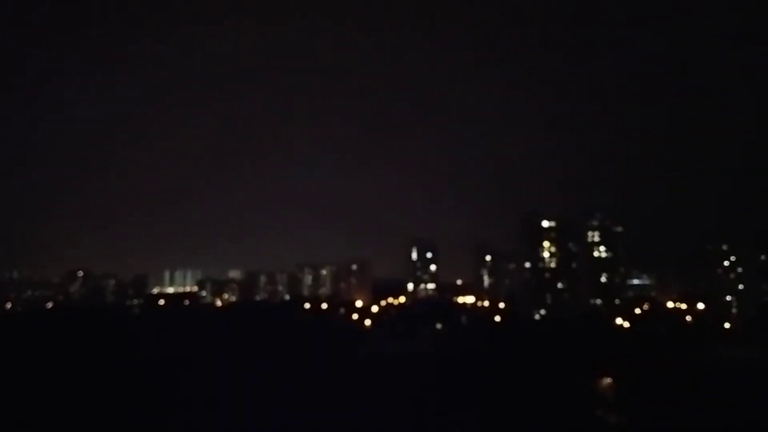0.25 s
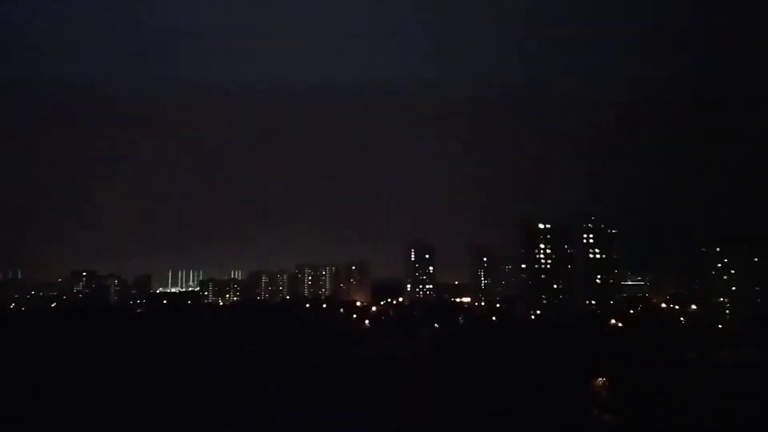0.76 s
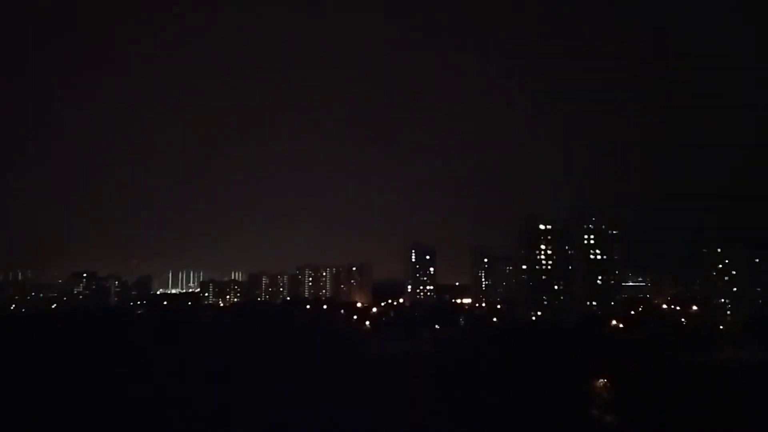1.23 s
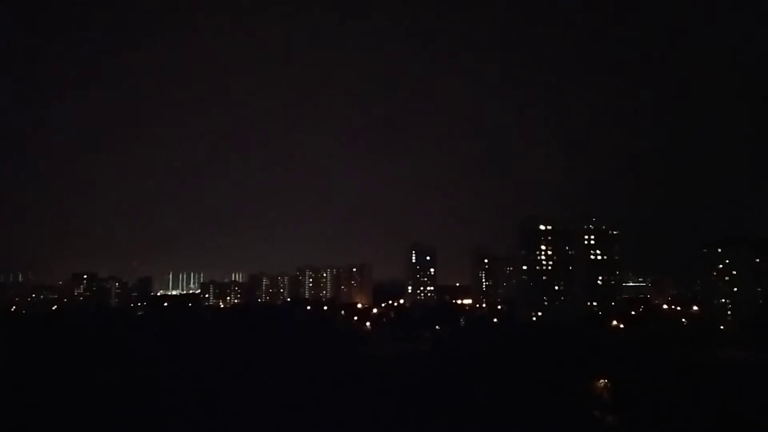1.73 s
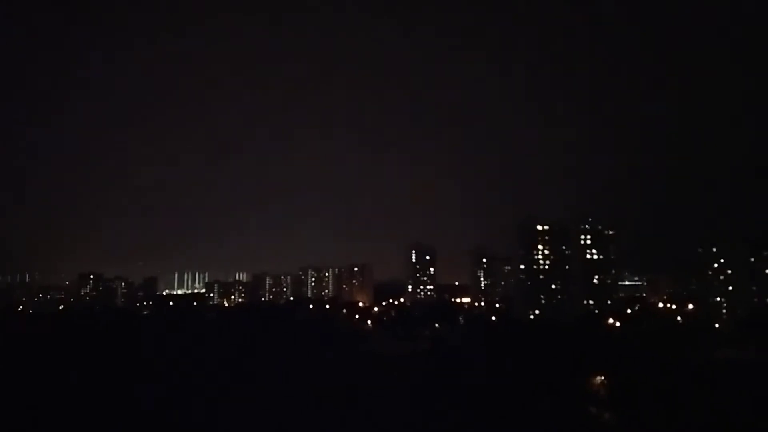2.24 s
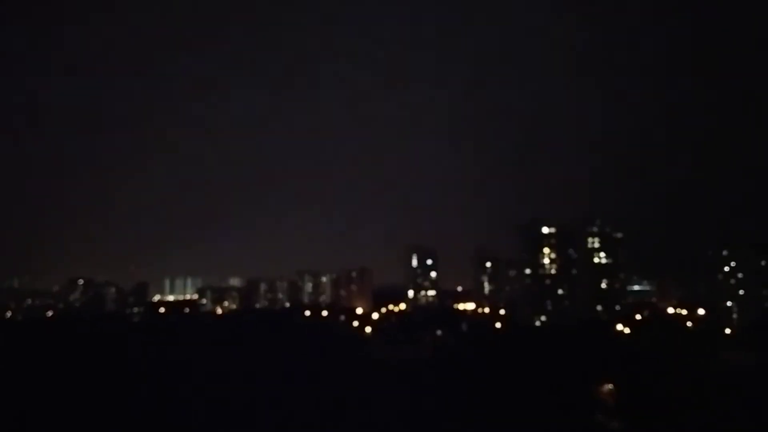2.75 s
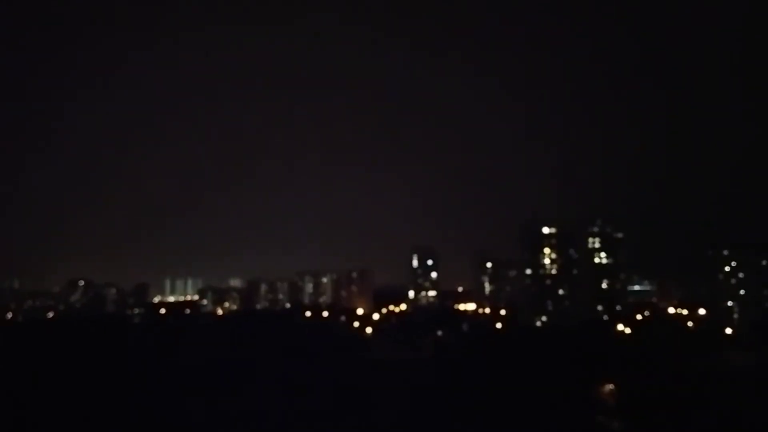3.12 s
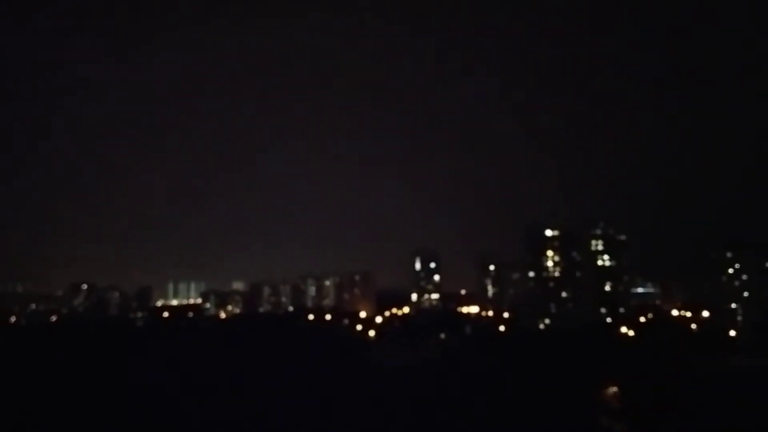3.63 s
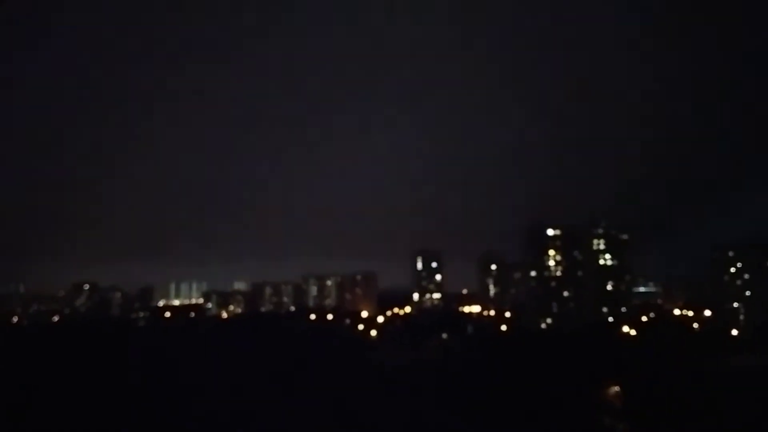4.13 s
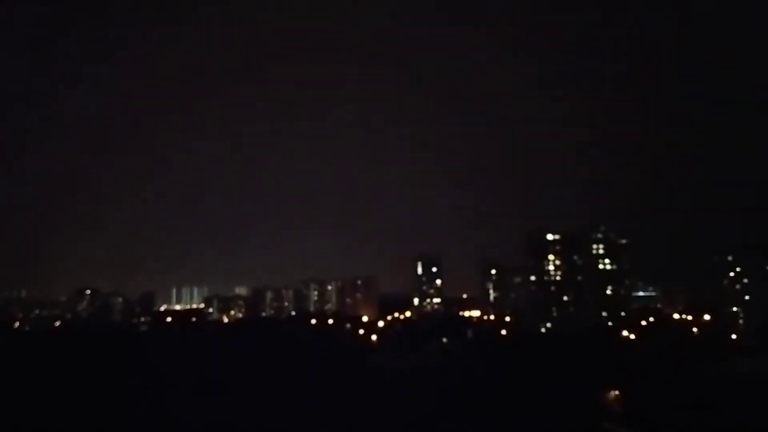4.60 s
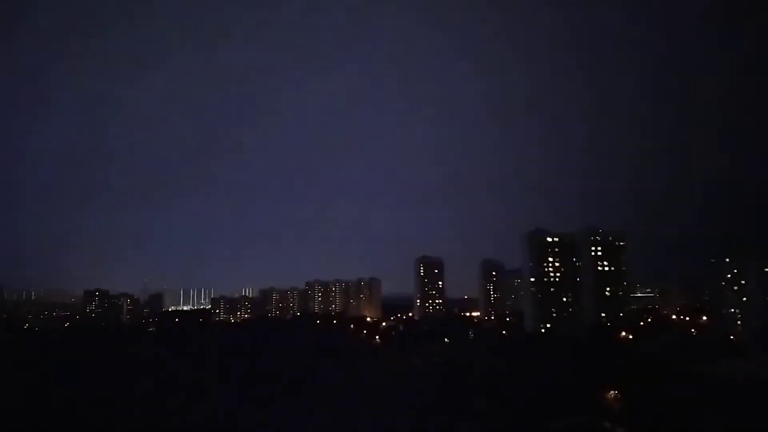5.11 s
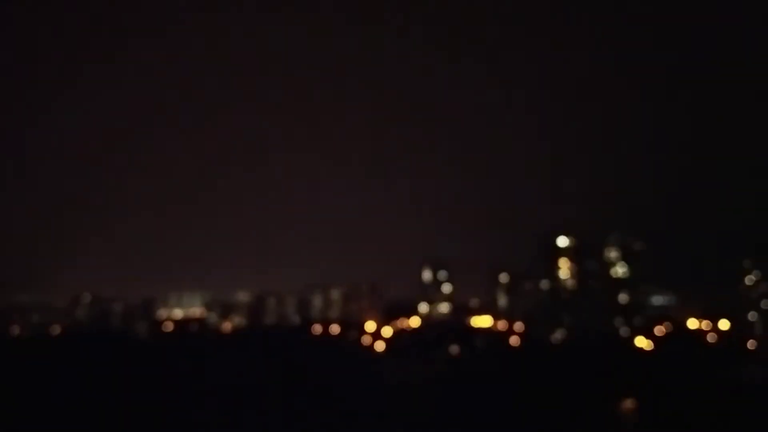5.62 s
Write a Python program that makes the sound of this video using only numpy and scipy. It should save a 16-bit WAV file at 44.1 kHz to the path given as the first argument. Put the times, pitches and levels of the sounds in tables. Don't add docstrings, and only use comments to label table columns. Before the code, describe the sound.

Thunder is already rolling as the sound begins, over a city at night, picked up by a phone at a window. A heavy boom swells at 0.2 seconds, another follows at 0.4, then scattered thuds around 0.8 to 1.05 sink into a quieter rumble until about 2.2. A nearer bend of the lightning answers at 2.35 and breaks into a dense, sharp, rattling cluster of claps from 2.55 to 2.8, strong again near 3.0, then drops away. Low uneven rumbling continues, with a small knock at 3.6 and a soft swell at 4.0. Late, duller claps come at 4.8, 5.0 to 5.15 and 5.5 to 5.7, and the rumble is cut off at 5.86. Beneath it lie faint rain hiss, swelling slightly around 4.25, tiny high drop ticks mostly on the right, clearest at 5.1 and 5.45, and a barely audible steady electronic buzz.

```python
import sys
import numpy as np
from scipy import signal
from scipy.fft import rfft, irfft
from scipy.io import wavfile
from scipy.ndimage import uniform_filter1d, minimum_filter1d

SR = 44100
rng = np.random.default_rng(int(sys.argv[2]) if len(sys.argv) > 2 else 0)


def unload_wav(signal):
    wavfile.write(
        sys.argv[1],
        SR,
        np.round(np.clip(np.atleast_2d(signal).T, -1, 1) * 32767).astype(np.int16),
    )


def volts_from_decibels(level):
    exponent = np.asarray(level, float) / 20
    return 10 ** exponent


N = 258426
HZ = np.fft.rfftfreq(N, 1 / SR)
T = np.arange(N) / SR

# t/s, level/dB, depth/dB (big slow fronts over small sharp ones)
ROLL = [(0, -26.5, 2), (.16, -29.5, 2), (.25, -20, 1), (.45, -24.5, 2.5), (.65, -29.5, 1), (.9, -27.5, 2.5),
        (1.22, -31, 4.5), (1.55, -34.5, 0.5), (1.7, -35, -0.5), (2.0, -33.5, 1.5), (2.27, -35, -1),
        (2.53, -25, -3), (2.6, -19, -5), (2.979, -22.5, -1), (3.3, -31, -1.5), (4.3, -32.5, -4),
        (4.68, -32, 0.5), (5.86, -31, 0.5)]
# t/s, boost/dB, fall/s, leading front over the crowd/dB, added depth/dB
CLAPS = [(0.21, 3.5, 0.031, 26.5, 0.5), (.236, 3.5, 0.024, 24.5, 0.5), (0.409, 2.5, 0.03, 18.5, 4),
         (.803, 2, 0.026, 22.5, 1.5), (.905, 0, 0.018, 26, 2.5), (1.05, 1.5, 0.022, 17.5, 3),
         (1.67, 3.5, .04, 17, -3), (2.355, 6, 0.034, 15.5, -3), (2.561, 4, 0.041, 24, -1.5),
         (2.591, 7.5, .02, 23.5, -1.5), (2.628, 6, 0.022, 20.5, -1), (2.668, 7.5, .02, 24.5, -5),
         (2.737, 2, 0.0085, 25, 1), (2.808, 1, .015, 26.5, -1), (3.025, 1, 0.024, 25.5, 1.5),
         (3.58, 4, 0.0082, 17.5, 0.5), (4.027, 2.5, 0.062, 28, 1.5), (4.81, 4.5, 0.014, 22.5, -1),
         (4.828, 5.5, 0.018, 24.5, 1), (5.025, 2, 0.063, 22.5, -2), (5.158, 2.5, 0.042, 24.5, 4),
         (5.518, 8, 0.034, 23, 3.5), (5.56, 4.5, 0.023, 16, 2.5), (5.674, 5, .03, 22.5, 2.5)]
# t/s, distance/km
DISTANCE = [
    (0, 3.07),
    (1.0, 2.33),
    (1.7, 1.7),
    (2.1, 1.8),
    (2.3, 2.69),
    (3.6, 2.66),
    (4.3, 3.06),
    (4.7, 3.5),
    (5.86, 4),
]
# low edge f/Hz, high edge f/Hz, arrival rate/(1/s), size scatter/dB
LAYERS = [
    (10, 172, 1500, 1.6),
    (172.5, 355, 1900, 0.85),
    (352, 990, 4000, 0.87),
    (929, 3000, 6000, 1.5),
]
# level over roll/dB, share of depth/1, loss with distance (negative: gain)/(dB/km), own flutter/dB
LAYER_BALANCE = [
    (-2, 1, 2.2, 1.77),
    (-2.03, 0.18, -1.2, 0.97),
    (-4.5, -0.47, -0.4, 1.55),
    (-15.5, -0.42, 5, 1.27),
]
# f/Hz, left/(dB per Hz), right/(dB per Hz)
PORTS = [(30.7, -92.5, -90), (55, -66.5, -78), (107.4, -42.5, -56), (208, -41, -54.5), (319, -45.5, -59),
         (420, -51.5, -61), (432, -50.5, -52.5), (524, -55.5, -54), (625, -58, -58.5), (846, -60.5, -61.5),
         (964, -67, -65.5), (1154, -66, -69), (1830, -80.5, -78), (3020, -100, -90)]
# f/Hz, share/1
ALIKE = [(25, .93), (60, .995), (150, .998), (300, .985), (410, .93), (490, .985), (630, .72), (760, .95),
         (870, .9), (1000, .6), (1200, .65), (1500, .35), (2800, .35)]
# f/Hz, width/Hz, gain/dB
RECESS = [(216, 24, 3), (282, 24, 3), (470, 24, 2), (506, 18, 6), (592, 20, 2), (747, 30, 3), (1022, 36, 3),
          (1150, 60, 2), (1857, 70, 3), (2445, 60, 3)]
# f/Hz, left/(dB per Hz), right/(dB per Hz)
HISS = [(1460, -72.5, -75), (2570, -89, -84), (3200, -95, -93.5), (4715, -98, -94.5), (4780, -109, -105),
        (5740, -106, -100.5), (7470, -100, -93.5), (8070, -101, -99.5), (9500, -99.5, -109),
        (9560, -101.5, -118), (10300, -105.5, -120), (11300, -113.5, -117), (12200, -114, -114),
        (14100, -116, -116.5)]
# t/s, level/dB
SWELL = [
    (0, 0),
    (3.75, 0),
    (4.0, 4),
    (4.25, 6.5),
    (4.45, 4.5),
    (4.65, 0),
    (5.4, 0),
    (5.6, 2),
    (5.86, 0),
]
# t/s, peak/dB, f/Hz, left minus right/dB
DROPS = [
    (1.838, -55, 7350, -14),
    (2.309, -53, 7480, -14),
    (3.21, -55, 8200, -10),
    (3.82, -55, 7550, -14),
    (4.17, -56, 2750, -6),
    (4.9, -55, 2500, -10),
    (5.117, -47, 7050, -20),
    (5.442, -48, 7400, -20),
    (5.479, -52, 7430, -16),
    (5.815, -53, 7390, -16),
]
BUZZ_ORDERS = [55, 56, 57, 60, 62, 63, 66, 67, 68, 71, 72, 73, 74, 75, 76, 85, 90, 91, 108]
# left/dB, right/dB
BUZZ_LEVELS = [(-84, -71), (-83, -76), (-89, -72), (-86, -82), (-71, -84), (-82, -85), (-82, -78),
               (-83, -86), (-87, -82), (-84, -81), (-87, -83), (-83, -86), (-90, -77), (-81, -85),
               (-94, -80), (-85, -93), (-93, -82), (-82, -81), (-92, -86)]

USUAL_KM = 3
CLAP_RISE_S = 0.011
LEADER_HZ = 600
EVEN_SHARE, EVEN_S = 0.59, 0.061
LEFT_LAG_S = 0.0001
LIMIT_PEAK = 0.76
BUZZ_HZ = 48.925


def thunder():
    level_db, depth_db = roll_and_claps()
    further_km = np.interp(T, *np.transpose(DISTANCE)) - USUAL_KM
    leaders = leading_fronts()
    hz, share = np.transpose(ALIKE)
    alike = np.clip(np.interp(np.log(HZ + 1), np.log(hz), share), 0, 1)
    ports = colour(PORTS) * recess() * band(25, 2800, steep=46)
    level_db = level_db + 0.41 * walk(12)
    out = 0
    for layer, balance in zip(LAYERS, LAYER_BALANCE):
        lo_hz, hi_hz, rate_hz, scatter_db = layer
        over_db, depth_share, loss_db_per_km, flutter_db = balance
        shape = ports * band(lo_hz, hi_hz)
        shape = shape / np.sqrt(np.mean(shape.mean(axis=0) ** 2))
        crowd = evened(arrivals(rate_hz, scatter_db), shape.mean(axis=0))
        db = level_db + over_db + depth_share * depth_db
        db = db - loss_db_per_km * further_km + flutter_db * walk(4.984)
        front, echo = rfft((crowd + leaders) * volts_from_decibels(db))
        left = front * np.exp(-2j * np.pi * HZ * LEFT_LAG_S)
        right = alike * front + np.sqrt(1 - alike ** 2) * echo
        out = out + shape * np.array([left, right])
    return irfft(out, N)


def roll_and_claps():
    t_s, *controls = np.transpose(ROLL)
    level_db, depth_db = (np.interp(T, t_s, c) for c in controls)
    for t, boost_db, fall_s, _, deeper_db in CLAPS:
        time_ratio = np.where(T < t, (t - T) / CLAP_RISE_S, (T - t) / fall_s)
        swell = np.exp(-time_ratio ** 2)
        level_db = level_db + boost_db * swell
        depth_db = depth_db + deeper_db * swell
    return level_db, depth_db


def leading_fronts():
    fronts = np.zeros((2, N))
    fronts[0, [int(row[0] * SR) for row in CLAPS]] = [volts_from_decibels(row[3]) for row in CLAPS]
    return irfft(rfft(fronts) * band(70, LEADER_HZ, steep=2.5), N)


def arrivals(rate_hz, scatter_db):
    hits = rng.random((2, N)) < rate_hz / SR
    size = volts_from_decibels(scatter_db * rng.exponential(size=(2, N)))
    x = hits * size * rng.standard_normal((2, N))
    return x / x.std(axis=-1, keepdims=True)


def evened(fronts, shape):
    window = int(EVEN_S * SR)
    power = irfft(rfft(fronts[0]) * shape, N) ** 2
    power = uniform_filter1d(uniform_filter1d(power, window), window)
    return fronts * (power / power.mean()) ** (-EVEN_SHARE / 2)


def recess():
    return volts_from_decibels(sum(db / (1 + (2 * (HZ - hz) / width_hz) ** 2) for hz, width_hz, db in RECESS))


def limited(x):
    gain = np.minimum(1, LIMIT_PEAK / (np.abs(x).max(axis=0) + 1e-9))
    gain = minimum_filter1d(gain, size=441)
    return x * uniform_filter1d(uniform_filter1d(gain, size=221), size=221)


def colour(table):
    hz, *columns = np.transpose(table)
    return np.array([volts_from_decibels(np.interp(np.log(HZ + 1), np.log(hz), c)) for c in columns])


def band(lo_hz, hi_hz, steep=8):
    return 1 / np.sqrt((1 + (lo_hz / (HZ + 1)) ** steep) * (1 + (HZ / hi_hz) ** steep))


def walk(rate_hz):
    k = int(SR / rate_hz)
    held = np.repeat(rng.standard_normal(N // k + 1), k)
    return 1.29 * uniform_filter1d(uniform_filter1d(held, k), k)[:N]


def rain():
    grain = rng.standard_normal((2, N)) * volts_from_decibels(0.75 * rng.exponential(size=(2, N)))
    spectrum = rfft(grain / grain.std()) * colour(HISS) * np.sqrt(SR / 2)
    spectrum = spectrum * band(2900, 16000, steep=4.84)
    port_share = np.array([[0.3], [1]])
    swell = volts_from_decibels(np.interp(T, *np.transpose(SWELL)) * port_share + 0.5 * walk(7))
    whistle = band(7000, 10000, steep=16) ** 2
    return irfft(spectrum * (1 - whistle), N) + swell * irfft(spectrum * whistle, N)


def drops():
    length = 2000
    out, t = np.zeros((2, N + length)), np.arange(length) / SR
    for t_s, peak_db, hz, pan_db in DROPS:
        envelope = (1 - np.exp(-t * hz / 6)) * np.exp(-t * hz / 24)
        ring = np.sin(2 * np.pi * hz * t) * envelope
        start = int(t_s * SR)
        out[:, start:start + length] += volts_from_decibels(peak_db + 8.5 + np.array([[pan_db], [0]])) * ring
    return out[:, :N]


def buzz():
    out = 0
    phases = 2 * np.pi * rng.random(len(BUZZ_LEVELS))
    for order, db, phase in zip(BUZZ_ORDERS, BUZZ_LEVELS, phases):
        tone = np.sin(2 * np.pi * order * BUZZ_HZ * T + phase)
        out = out + np.sqrt(2) * volts_from_decibels(np.array(db)[:, None]) * tone
    return out


def scene():
    return limited(thunder()) + rain() + drops() + buzz()


def top_cut(x):
    return signal.sosfilt(signal.butter(12, 14250, fs=SR, output="sos"), x)


def record(dry):
    closing = np.clip((T[-1] - T) / 0.004, 0, 1)
    return top_cut(dry * closing)


dry = scene()
out = record(dry)
unload_wav(out)
```